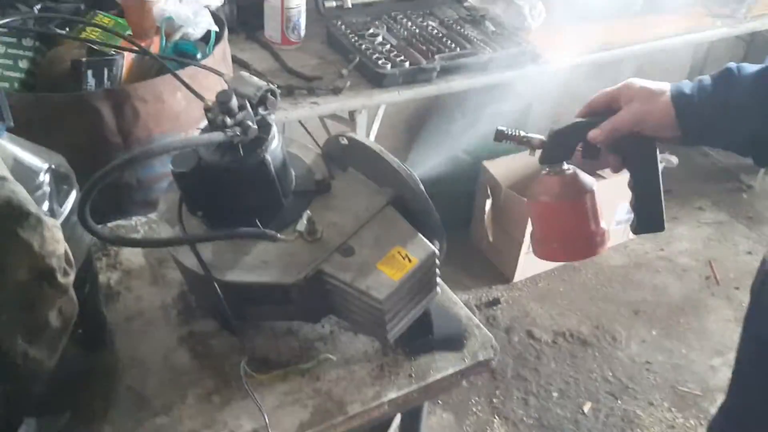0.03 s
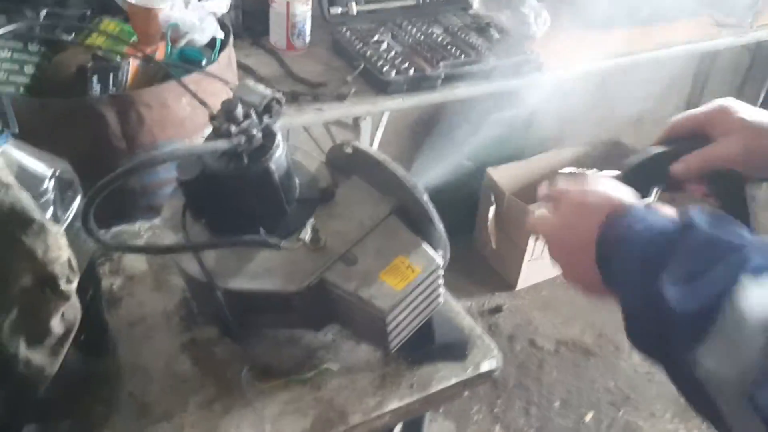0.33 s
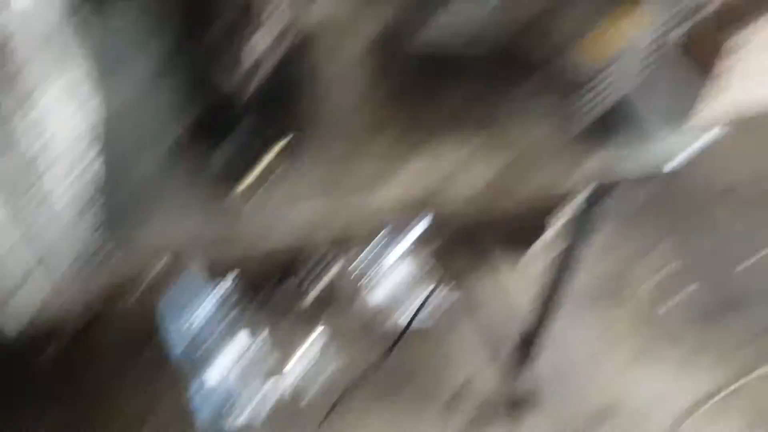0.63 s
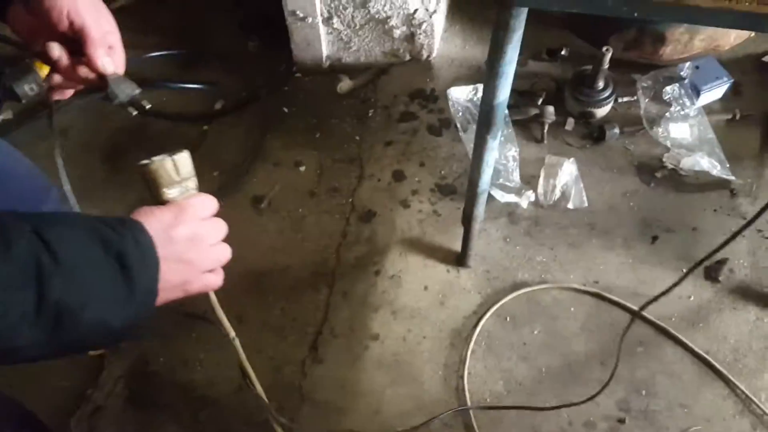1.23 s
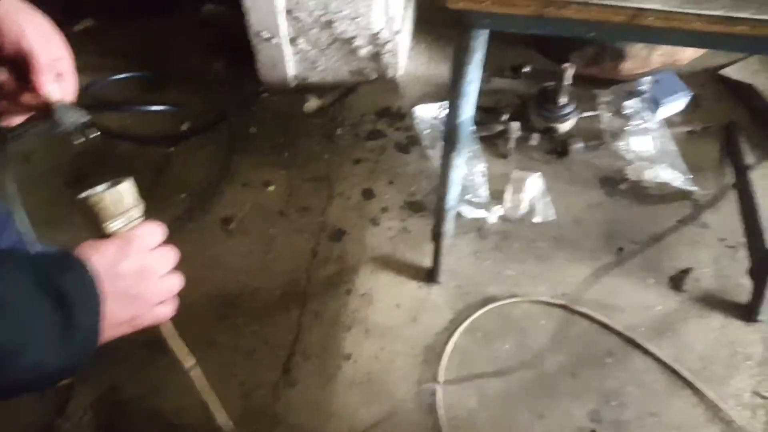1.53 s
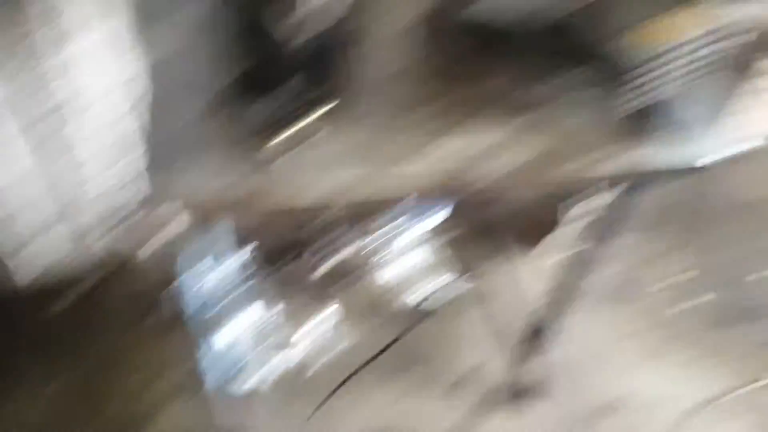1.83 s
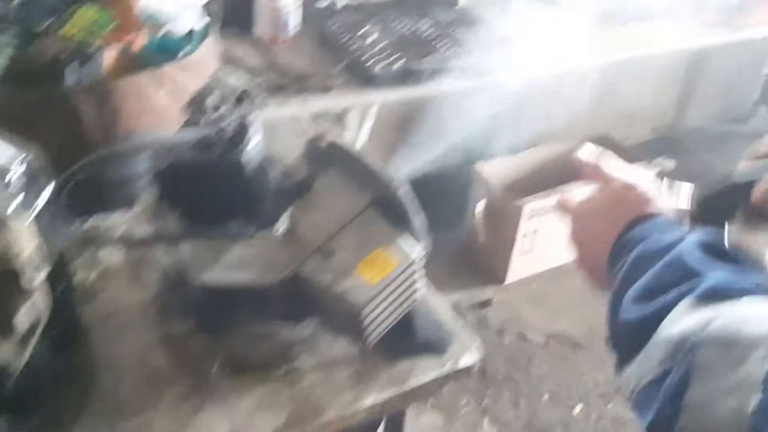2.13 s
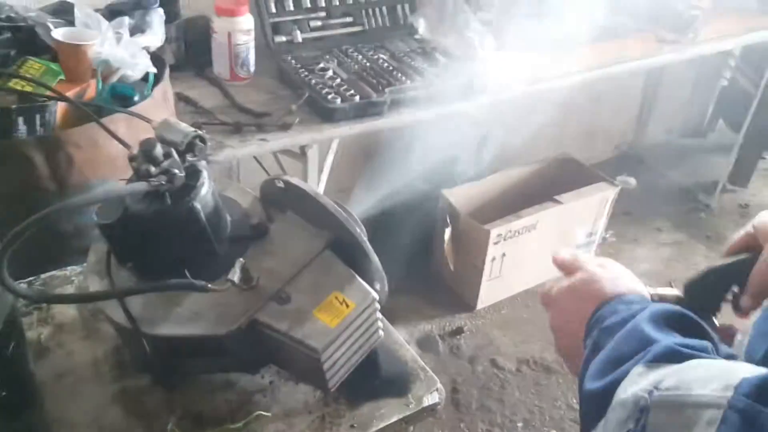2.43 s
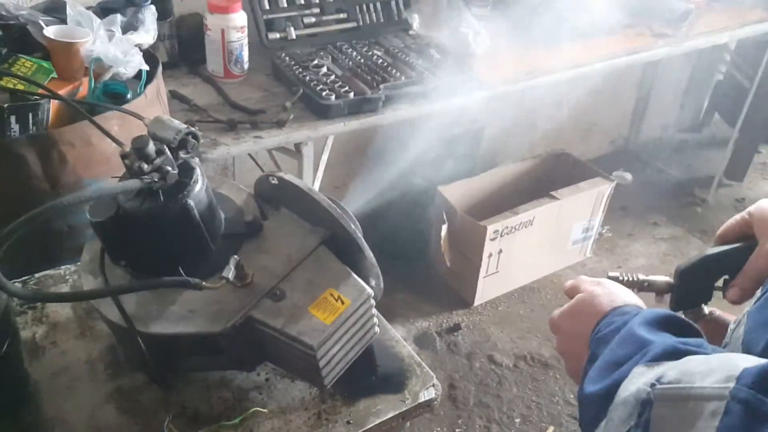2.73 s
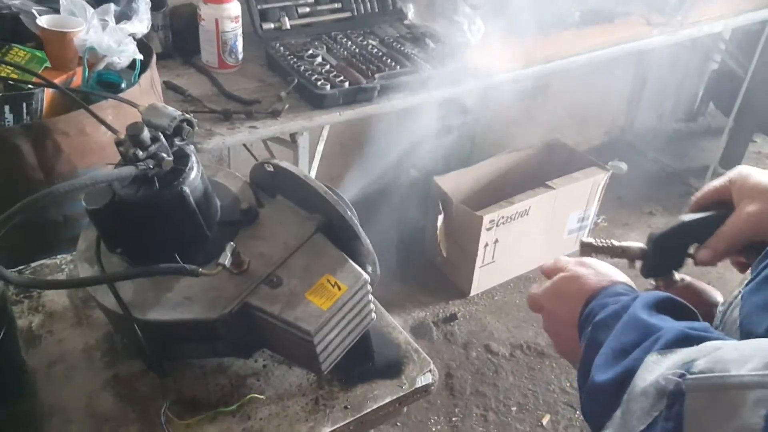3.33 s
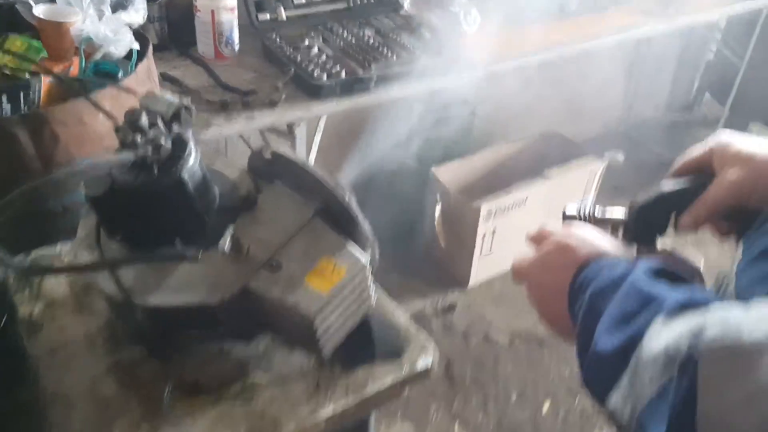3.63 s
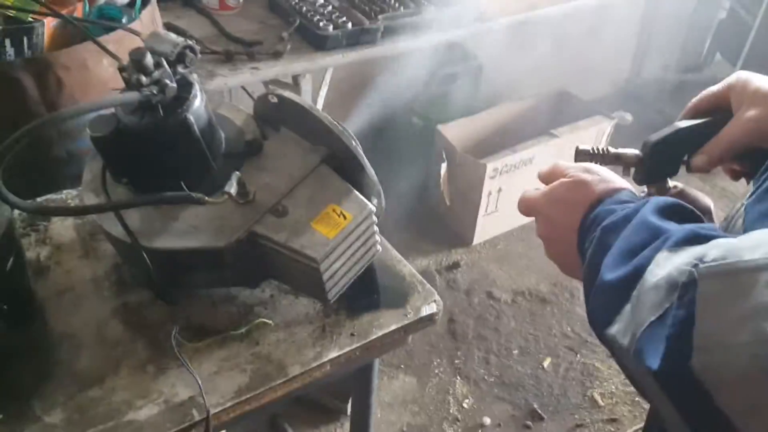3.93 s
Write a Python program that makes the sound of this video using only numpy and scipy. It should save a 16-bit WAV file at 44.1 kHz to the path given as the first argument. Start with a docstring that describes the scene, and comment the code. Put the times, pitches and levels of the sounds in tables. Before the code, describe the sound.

A heater fan's rumbling rush cuts out early and slowly fades to a weak hum and hiss in a small workshop. Nearby, handling of a plug and torch makes sharp metallic clacks, the last ones followed by soft puffs.

```python
"""An oil burner's fan roars in a small workshop, is unplugged within a second and coasts to a weak hum.
Its blade tone sinks, the housing rings on and the bearings hiss as the rush of air dies away.
Close to the stereo microphones, a plug and a hand torch are handled: a brief scrape and sharp double
clacks of a catch snapping and rebounding, the last ones followed by dull puffs."""
import sys
import numpy as np
from scipy import signal
from scipy.fft import rfft, irfft
from scipy.io import wavfile

SR = 44100
rng = np.random.default_rng(int(sys.argv[2]) if len(sys.argv) > 2 else 0)


def master_out(mix):
    """Clip the mix to full scale and print it as 16-bit PCM to the path in sys.argv[1]."""
    frames = np.transpose(np.atleast_2d(mix))
    ceiling = np.clip(frames, -1, 1)
    pcm = np.round(ceiling * 32767).astype(np.int16)
    wavfile.write(sys.argv[1], SR, pcm)


N = 176400
T = np.arange(N) / SR
POWER_OFF_S, FADE_DB_PER_S = 0.72, 25  # the plug comes out and the full-speed ringing dies
SIDES = np.array([[.5], [-.5]])  # splits a level difference between left and right


def amp(db):
    """Decibels to gain."""
    return 10 ** (np.asarray(db) / 20)


def unit(x):
    """Scales to rms 1."""
    return x / np.sqrt(np.mean(x ** 2) + 1e-20)


def read(points, hz):
    """Reads a spectrum on a log-frequency axis."""
    f, value = np.transpose(points)
    return np.interp(np.log(hz + 1), np.log(f + 1), value)


def tilted(points, tilt, hz):
    """Gains of a spectrum tilted by some dB per octave."""
    return amp(read(points, hz) + tilt * np.log2(hz + 20))


def curve(rows):
    """The columns of a time table, one value per sample."""
    s, *columns = np.transpose(rows)
    return [np.interp(T, s, c) for c in columns]


def add(mix, start_s, sound):
    """Mixes a stereo sound in at a time."""
    part = mix[:, round(start_s * SR):][:, :sound.shape[1]]
    part += sound[:, :part.shape[1]]


def wander(rate_hz):
    """Random drift of rms 1, mostly slower than the given rate."""
    hz = np.fft.rfftfreq(N, 1 / SR)
    return unit(irfft(rfft(rng.standard_normal(N)) / (1 + (hz / rate_hz) ** 4), N))


def tone(hz, width_hz):
    """A fuzzy tone that follows a pitch curve."""
    phase = 2 * np.pi * np.cumsum(hz) / SR
    return unit(wander(width_hz / 2) * np.cos(phase) + wander(width_hz / 2) * np.sin(phase))


# How alike the two microphones hear the machine: freq_hz, likeness (clipped to 0..1)
MIC_LIKENESS = [(40, 0.7), (120, 1.2), (240, 1), (480, .87), (950, 0.59), (1900, -0.15), (3800, 0.54),
                (7500, 0.34)]
# Balance across the pair: freq_hz, left_minus_right_db
MIC_BALANCE = [(240, 0.1), (950, 0), (1900, -3.5), (3800, -4.5), (7500, -2.5), (15000, 6.5)]
def noise(shape, size=N):
    """Stereo noise of rms 1 with the gains shape(hz), alike at both microphones in the bass."""
    hz = np.fft.rfftfreq(size, 1 / SR)
    mid, side = rfft(rng.standard_normal((2, size)))
    likeness = np.clip(read(MIC_LIKENESS, hz), 0, 1)
    mid, side = mid * np.sqrt(1 + likeness), side * np.sqrt(1 - likeness)
    pair = np.array([mid + side, mid - side]) * amp(SIDES * read(MIC_BALANCE, hz))
    return unit(irfft(pair * shape(hz), size))


def band(points, ripple_db=2.5, ripple_hz=9):
    """Noise with a given spectrum, finely rippled by the standing waves of the room."""
    grid = np.arange(4000) * ripple_hz
    ripple = rng.standard_normal(len(grid))
    return noise(lambda hz: amp(read(points, hz) + ripple_db * np.interp(hz, grid, ripple)))


# Reverberation of the small workshop: freq_hz, t60_s
ROOM_DECAY = [(150, 0.79), (600, 0.42), (1500, 0.42), (3500, 0.67), (9000, 0.39), (15000, 0.23)]
def room(x, early_s=0.005, early_gain=2.5):
    """Dense wall reflections, strongest early, each band dying at its own speed."""
    hz, t, spectra = signal.stft(rng.standard_normal((2, SR // 2)), SR, nperseg=256)
    decay = amp(-60 * t / read(ROOM_DECAY, hz)[:, None])
    tail = signal.istft(spectra * decay, SR, nperseg=256)[1]
    t = np.arange(tail.shape[1]) / SR
    onset = np.clip(t / 0.002 - .5, 0, 1)
    tail = tail * onset * (1 + early_gain * np.exp(-t / early_s))
    return signal.fftconvolve(x, tail / np.linalg.norm(tail[0]), axes=1)[:, :N]


# Room tone around the microphones: freq_hz, density_db
SHOP_SPECTRUM = [(20, -31), (50, 5), (85, -8), (160, 8.5), (260, -7.5), (380, -22), (700, -19), (1450, -14),
                 (2050, -13), (3000, -12), (3900, -30), (6300, -21), (7700, -12), (8400, -24),
                 (9000, -17.5), (10200, -25), (16000, -30)]
def room_tone(level_db=-50.5):
    """The workshop's steady low hum, with a faint high hiss."""
    return amp(level_db) * band(SHOP_SPECTRUM)


# The plug, close by: freq_hz, density_db
SCRAPE_SPECTRUM = [(800, -9), (1900, 8), (2900, 4), (4500, -0.5), (8000, -36), (16000, -33)]
def plug_scrape(peak_s=0.915, width_s=0.06, level_db=-35, grain_db=4.0):
    """Plug and cord rub together in one brief grainy stroke."""
    stroke = np.exp(-.5 * ((T - peak_s) / width_s) ** 2)
    return band(SCRAPE_SPECTRUM) * amp(level_db + grain_db * wander(120)) * stroke


# The torch, close by: start_s, level_db, rise_s, decay_s, tilt_db_per_octave, hollow_hz, hollow_db
TORCH_PUFFS = [(2.989, -29.5, 0.0067, 0.0065, 4, 575, -30), (3.011, -27.5, 0.0067, 0.0048, .5, 591, -30),
               (3.096, -27, 0.0054, .0105, 1, 400, -33), (3.100, -37, .006, 0.016, 2.5, 280, -30),
               (3.2974, -32.5, 0.0024, 0.0092, 2.5, 805, -38),
               (3.309, -26.5, 0.011, 0.0094, .8, 741, -35.5), (3.744, -29, 0.0054, 0.01, 0.2, 584, -29.5),
               (3.796, -36, 0.016, 0.016, 2.5, 203, -37)]
# A puff before its tilt: freq_hz, density_db
PUFF_SPECTRUM = [(40, -14), (110, -5), (210, 6.5), (310, -2), (450, -6), (750, -7), (1100, -11),
                 (1800, -11), (3000, -23.5), (8000, -38.5), (16000, -49)]
def torch_puffs(hollow_decay_s=0.009, room_db=-5):
    """Short dull bursts with a hollow ring, like gas catching at the torch and going out."""
    direct, t = np.zeros((2, N)), T[:SR // 8]
    for start_s, db, rise_s, decay_s, tilt, hollow_hz, hollow_db in TORCH_PUFFS:
        attack = np.minimum(t / rise_s, 1) ** 2
        past_peak_s = np.maximum(t - rise_s, 0)
        gas = noise(lambda hz: tilted(PUFF_SPECTRUM, tilt, hz), size=len(t))
        burst = amp(db) * np.exp(-past_peak_s / decay_s) * gas
        hollow = amp(hollow_db) * np.exp(-past_peak_s / hollow_decay_s) * np.sin(2 * np.pi * hollow_hz * t)
        add(direct, start_s, attack * (burst + hollow))
    return direct + amp(room_db) * room(direct)[0]


# Modes of the catch and nozzle: pitch_hz, relative_db, t60_s
METAL_MODES = [(1646, -16, .06), (2110, -25, .13), (2820, -18.5, 0.14), (3550, -19.5, 0.061),
               (4700, -24.5, 0.086), (6000, -26.5, 0.11), (8870, -19, .08)]
def metal_ring(tilt, pan_db, detune=.012, trim_db=-1):
    """The metal rings after a snap, tuned a little differently with each grip."""
    t, ring = T[:SR // 5], 0
    for hz, db, t60_s in METAL_MODES:
        pitch_hz = hz * (1 + detune * rng.uniform(-1.04, 1))
        level_db = db + tilt * np.log2(hz / 4000) + SIDES * pan_db * read(CLACK_PAN_SHARE, hz)
        phase = 2 * np.pi * (pitch_hz * t + rng.random((2, 1)))
        ring = ring + amp(level_db - 60 * t / t60_s) * np.sin(phase)
    return amp(trim_db) * ring


def crack(t, gains, decay_s=.0018):
    """One impact: a noise burst dying within milliseconds, its spectrum smoothed to the given gains."""
    burst = rng.standard_normal((2, len(t))) * np.exp(-abs(t) / decay_s) * (t >= 0)
    spectrum = gains * np.exp(1j * np.angle(rfft(burst)))
    fade = np.cos(np.pi / 2 * t / t[-1]) ** 2
    return fade * irfft(spectrum, len(t)) * np.sqrt(decay_s * SR / 2)


# Handling, close and to the left:
# start_s, level_db, pan_db, rebound_after_s, rebound_relative_db, tilt_db_per_octave
CATCH_SNAPS = [(0.4877, -12, 5, 0.006, -3.5, 0), (0.731, -28, 5, 0.003, -4, -4.5),
               (.901, -16.5, 5, 0.0027, -9, -4), (0.9229, -17, 3.5, 0.0047, 2, -1.5),
               (2.0078, -29, 4, .007, -16, 0.5), (2.972, -14.5, 3, 0.0072, -2, 1),
               (3.4179, -34, 14, 0.0084, -7, 1), (3.7265, -11, 3.5, 0.008, -9, 1)]
# A clack before its tilt: freq_hz, density_db
CLACK_SPECTRUM = [(200, -20), (750, -13), (1250, 0), (2200, 1.5), (3400, 1.5), (4050, -9), (4700, -2),
                  (5350, -6), (6400, -1), (8000, 3.5), (9100, 2.5), (10600, -3), (13000, 1), (16000, -11)]
# Scales pan_db to the left-minus-right level at the microphones: freq_hz, factor
CLACK_PAN_SHARE = [(1000, 0.8), (3500, -1), (6000, -2.5), (9000, 1.46), (13000, 0.44)]
def catch_clacks(room_db=-1.5):
    """A catch snaps and rebounds: two dry cracks that the room spreads out, and a short ring of metal."""
    direct, to_walls = np.zeros((2, 2, N))
    t = np.arange(-8, 1016) / SR
    hz = np.fft.rfftfreq(len(t), 1 / SR)
    for start_s, db, pan_db, rebound_s, rebound_db, tilt in CATCH_SNAPS:
        colour = unit(tilted(CLACK_SPECTRUM, tilt, hz))
        balance = amp(SIDES * pan_db * read(CLACK_PAN_SHARE, hz))
        add(direct, start_s, amp(db) * metal_ring(tilt, pan_db))
        for hit_s, hit_db in ((start_s, db), (start_s + rebound_s, db + rebound_db)):
            add(direct, hit_s + t[0], amp(hit_db) * crack(t, colour * balance))
            add(to_walls, hit_s + t[0], amp(hit_db) * crack(t, colour))
    return direct + amp(room_db) * room(to_walls)


def run_down(db_per_s):
    """A gain of 1 that falls away once the power is off."""
    return amp(-db_per_s * np.maximum(T - POWER_OFF_S, 0))


# The motor at full speed, faint under the fan: pitch_hz, level_db
MOTOR_WHINES = [(1823, -47), (2037, -46.5), (2690, -55)]
def motor(width_hz=14):
    """Thin whines that fade quickly when the power goes off."""
    whines = sum(amp(db) * np.array([tone(np.full(N, hz), width_hz) for mic in range(2)])
                 for hz, db in MOTOR_WHINES)
    return whines * run_down(2 * FADE_DB_PER_S)


# The band in which the casing lets the bearings sing: freq_hz, gain_db
CASING_BAND = [(3900, -26), (4330, -1), (4830, -2), (5300, -32)]
# The whine sets in as the rotor slows, right of centre: time_s, level_db
WHINE_SWELL = [(1.62, -62), (1.73, -51), (2.3, -49.5), (2.6, -51.5), (3.2, -62)]
def bearing_whine(spacing=.25, width_hz=38):
    """Multiples of the rotor's falling speed sing as they cross the casing's band."""
    blade_hz, _ = curve(BLADE_GLIDE)
    comb = [order * spacing * blade_hz for order in range(20, 40)]
    pair = [sum(tone(hz, width_hz) * amp(read(CASING_BAND, hz)) for hz in comb) for mic in range(2)]
    balance = amp(SIDES * read(MIC_BALANCE, 4500))
    return unit(np.array(pair)) * balance * amp(curve(WHINE_SWELL)[0])


# Bearing hiss at the microphones: time_s, level_db
HISS_LEVEL = [(0, -47), (1.15, -51), (1.55, -50), (1.75, -50.5), (2.25, -50), (2.55, -51.5), (2.9, -54),
              (3.4, -56.5), (4, -61)]
# Its colour: freq_hz, density_db
HISS_SPECTRUM = [(2500, -3.5), (3900, -4.5), (4350, 4), (4850, 2), (5400, -12), (6600, -19), (7300, -4),
                 (8400, -30), (10400, -14), (16000, -22)]
# The thin whistle above it: time_s, pitch_hz, level_db
BEARING_WHISTLE = [(1.5, 10750, -87), (2.1, 10650, -70), (2.6, 10210, -66), (3.1, 10100, -83)]
def bearings(flutter_db=1.24, whistle_rough_db=2.5):
    """The turning bearings hiss, whine and whistle with a flickering level."""
    whine = bearing_whine()
    hiss = band(HISS_SPECTRUM) * amp(curve(HISS_LEVEL)[0])
    flutter = amp(flutter_db * wander(51))
    whistle_hz, whistle_db = curve(BEARING_WHISTLE)
    whistle = np.array([tone(whistle_hz, width_hz=380) for mic in range(2)])
    return (hiss + whine) * flutter + whistle * amp(whistle_db + whistle_rough_db * wander(12))


# The coasting fan, centred between the microphones: time_s, pitch_hz, level_db
BLADE_GLIDE = [(1.0, 800, -64), (1.4, 734.5, -37.5), (1.78, 700.3, -38.5), (2.02, 645, -45),
               (2.25, 611.7, -47), (2.7, 562, -60), (4.0, 438.7, -85)]
def fan_blades(width_hz=36, lower_ratio=.915, lower_db=-6.5):
    """The blade tone sinks as the fan slows, and a second tone beats just below it."""
    pitch_hz, level_db = curve(BLADE_GLIDE)
    tones = tone(pitch_hz, width_hz) + amp(lower_db) * tone(lower_ratio * pitch_hz, width_hz)
    return tones * amp(level_db)


# Resonances of the fan housing: pitch_hz, nominal_width_hz, full_speed_db, coasting_db, coast_peak_s
HOUSING_MODES = [(242, 55, -34, -57, 1.3), (153.7, 26, -40, -54, 2.4), (176.3, 28, -38, -58, 2.25),
                 (410, 270, -47, -47, 1.84), (615, 18, -37.5, -46, 1.99), (975, 27, -39, -68, 2.04),
                 (1102, 114, -35.5, -60, 2.5), (1237, 32, -43.5, -51, 1.2), (2017, 43, -44.5, -53.5, 2.75),
                 (2100, 78, -48, -51.5, 2.47), (4477, 45, -60, -57.5, 2.23)]
def fan_housing(coast_width_s=0.76):
    """The casing rings at fixed pitches, driven first by the air and then by the coasting rotor."""
    air_drive, ringing = run_down(FADE_DB_PER_S), 0
    for pitch_hz, width_hz, full_db, coast_db, peak_s in HOUSING_MODES:
        mode = noise(lambda hz: 1 / (1 + ((hz - pitch_hz) / (0.36 * width_hz)) ** 2))
        rotor_drive = np.exp(-.5 * ((T - peak_s) / coast_width_s) ** 2)
        ringing = ringing + mode * np.hypot(amp(full_db) * air_drive, amp(coast_db) * rotor_drive)
    return ringing


# The burner's air at the microphones, before trims and treble fade: time_s, rumble_db, roar_db, treble_db
AIR_LEVELS = [(0.0, -30, -23.5, -33.5), (0.46, -28.5, -24.5, -34.5), (0.72, -31.5, -24, -35.5),
              (0.93, -31.5, -27, -35), (1.15, -30.5, -29.5, -38.5), (1.53, -34, -35, -43),
              (1.86, -37.5, -38, -43), (2.12, -39, -39.5, -43), (2.35, -42.5, -43.5, -44),
              (2.82, -45, -51, -44.5), (3.2, -48.5, -53, -44.5), (3.56, -54, -54, -45),
              (4.0, -56.5, -54, -47)]
# Its low, middle and high parts: freq_hz, density_db
RUMBLE_SPECTRUM = [(20, -46), (45, -40), (75, -15), (100, -13.5), (122, -13.5), (155, -7.5), (205, -5),
                   (245, 1), (320, -6.5), (450, -10.5), (650, -12.5), (1500, -61)]
ROAR_SPECTRUM = [(250, -32.5), (400, -14), (500, -11), (570, -4.5), (640, -2.5), (720, -5), (800, -6),
                 (980, -5), (1200, -6), (1350, -11.5), (1700, -12.5), (2500, -30.5), (5000, -63)]
TREBLE_SPECTRUM = [(800, -37), (1400, 2.5), (1850, 1), (2500, -3.5), (3600, -11.5), (4600, -10.5),
                   (6000, -15), (8000, -19), (10500, -29.5), (13000, -30), (16000, -40)]
def fan_air(rumble_trim_db=-1, roar_trim_db=-1, treble_trim_db=3):
    """Turbulent air from the fan: a lumpy rumble, and a roar and treble that flutter together."""
    rumble_db, roar_db, treble_db = curve(AIR_LEVELS)
    flutter = wander(rate_hz=22)
    rumble = band(RUMBLE_SPECTRUM) * amp(rumble_db + rumble_trim_db + 1.15 * wander(rate_hz=10))
    roar = band(ROAR_SPECTRUM) * amp(roar_db + roar_trim_db + .6 * flutter)
    treble = band(TREBLE_SPECTRUM) * amp(treble_db + treble_trim_db + .5 * flutter)
    return rumble + roar + treble * run_down(db_per_s=2.5)


def scene():
    """The burner, the close handling and the room tone, heard from one spot in the workshop."""
    burner = fan_air() + fan_housing() + motor() + fan_blades() + bearings()
    return burner + plug_scrape() + catch_clacks() + torch_puffs() + room_tone()


def record(dry):
    """The recorder's band limit cuts off the highest treble."""
    lowpass = signal.firwin(255, cutoff=16200, window=("kaiser", 9), fs=SR)
    return signal.oaconvolve(dry, lowpass[None], "same", axes=1)


dry = scene()
out = record(dry)
master_out(out)
```